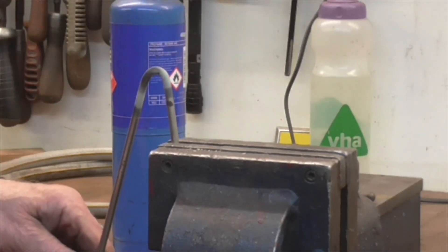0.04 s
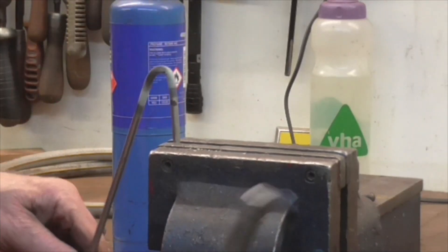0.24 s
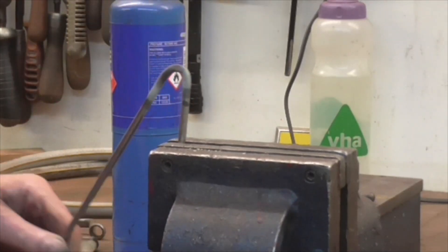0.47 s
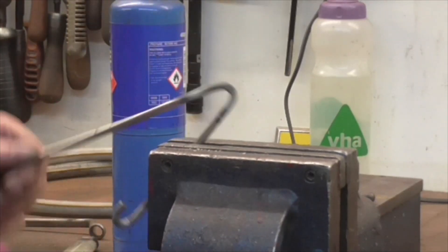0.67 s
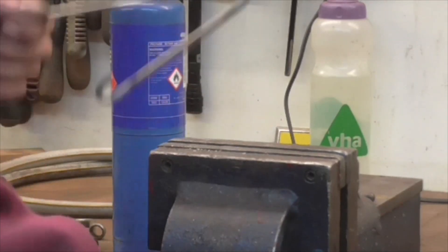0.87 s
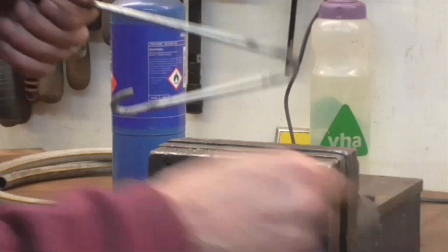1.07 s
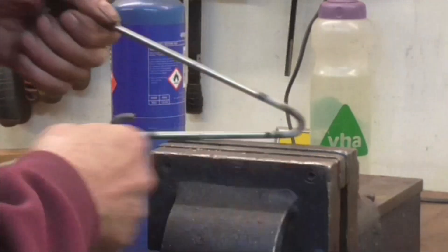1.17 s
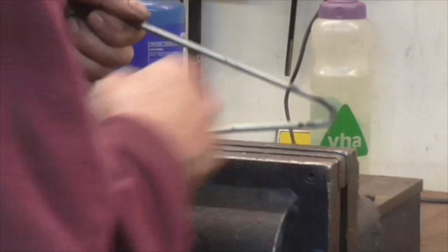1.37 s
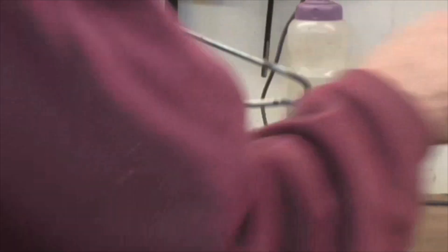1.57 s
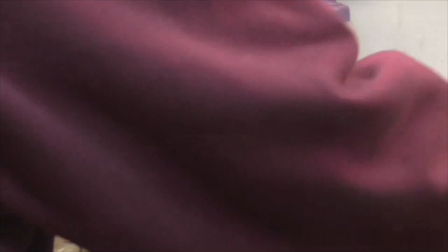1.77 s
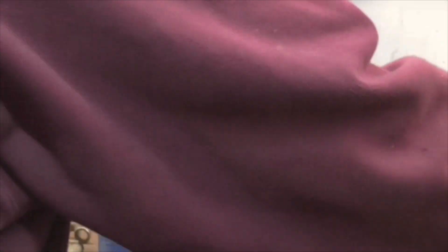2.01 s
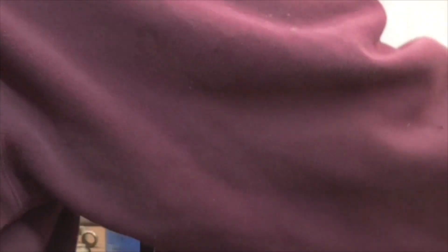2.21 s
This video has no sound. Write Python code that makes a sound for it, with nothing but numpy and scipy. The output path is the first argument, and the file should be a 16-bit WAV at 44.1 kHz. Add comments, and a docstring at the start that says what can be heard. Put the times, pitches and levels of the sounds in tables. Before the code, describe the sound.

A vise handle's metallic clank dominates: after faint hand brushing and small knocks from 0.2 seconds, it scrapes at 0.3 and lands sharply at 0.4, booming through the bench. Low grinding and weak knocks fade by 1.0. A steel rod clinks brightly at 1.25, a sleeve brushes near 1.6, and a tool clanks at 1.97, with tiny ticks at 2.1. Close, small workshop, faint low hum.

```python
"""A small workshop, where a bench vise is slackened: its handle scrapes, drops on its stop and shakes the bench.
The screw grinds, a bent steel rod is drawn from the jaws and clinks on the vise, a steel tool clanks on
the bench, a sleeve brushes past; a faint hum lies under it all.
Steel and bench ring as decaying modes, with noise cracks sounding beside them; scrapes, grinding and brushing
are trains of random slip clicks; the background is shaped noise and a sine."""
import sys
import numpy as np
from scipy import signal
from scipy.fft import rfft, irfft, next_fast_len
from scipy.io import wavfile

SR = 44100
rng = np.random.default_rng(int(sys.argv[2]) if len(sys.argv) > 2 else 0)


def transcribe(u):
    """Save the signal u as a 16-bit wav file named by the first command-line argument.

    u: samples, shape (n,) or (channels, n), limited to [-1, 1]; the rate is SR.
    q: integer samples, one column per channel.
    """
    v = np.clip(np.atleast_2d(u).T, -1, 1)
    q = np.round(v * 32767).astype(np.int16)
    wavfile.write(sys.argv[1], SR, q)


N = 99225
T = np.arange(int(0.7 * SR)) / SR  # time axis of one event, s
LEVEL_WINDOW_S = 0.01  # a blow's level is its energy averaged over this
EDGE_HZ = 16200  # upper band limit

# Modes of the handle. Each row: frequency in Hz, relative level in dB, t60 in s.
HANDLE_MODES = [(1650, -12, .1), (1935, -12, .1), (2540, -15, .05), (4750, -17, .14), (4880, -13, .07),
                (5040, -21, .2), (5445, -8, .05), (5545, 2, .055), (5562, -27, .35), (6480, -3, .03),
                (7560, -8, .05), (7665, -4, .05), (8010, -8, .04), (10840, -8, .05)]
# Colour of the handle's contact. Each row: frequency in Hz, relative density in dB.
HANDLE_CRACK = [(30, -31), (100, -3.5), (700, -4), (1900, -4), (3000, -3.5), (6300, 3), (9000, -11.5),
                (11000, -6.5), (16000, -23.5)]
# Handle on its stop. Each row: start in s, ring level in dB, contact level in dB, crack t60 in s.
HANDLE_HITS = [(0.4043, -18.5, -20, 0.036)]


def handle_drop():
    """The handle lands on its stop: steel modes and a short contact crack."""
    return clanks(HANDLE_HITS, HANDLE_MODES, HANDLE_CRACK, shimmer_db=-19, shimmer_t60=0.15)


# Colour of handle friction. Each row: frequency in Hz, relative level in dB.
SLIDE_COLOUR = [(30, -48), (200, -47), (1850, 11.5), (2300, 0.5), (3800, 3.5), (4800, 8), (5600, -2.5),
                (7700, 1.5), (9000, -20), (15000, -21)]
# Handle sliding through its hole. Each row: start in s, length in s, level in dB.
SLIDES = [(.2, 0.03, -71), (0.287, 0.036, -40.5), (0.32, .012, -34.5), (0.3286, .014, -24.5),
          (0.345, 0.069, -65)]
HAND_DAMPING = 0.444  # share of the ring time left while the handle is pushed along


def handle_slide():
    """Stick-slip clicks excite the handle's own modes, damped by the hand."""
    out = np.zeros(N)
    damped = [(hz, db, t60 * HAND_DAMPING) for hz, db, t60 in HANDLE_MODES]
    for start_s, length_s, db in SLIDES:
        drive = slips(length_s, per_s=5000, spread_db=-3, rise_s=0.002, fall_s=0.0019)
        scrape = colour(through(drive, damped, ring_db=0), SLIDE_COLOUR)
        add(out, start_s, sized(scrape, db, length_s))
    return out


# Colour of the wooden bench. Each row: frequency in Hz, relative density in dB.
WOOD_COLOUR = [(25, -23), (60, -5), (90, 8.5), (170, 2), (330, 6), (500, 0.5), (750, -0.5), (1950, -3.5),
               (2500, -17.5), (6000, -1), (15000, -39)]
# Modes of the vise on its bench, plus a low 172 Hz thump of hand or sleeve. Each row: frequency in Hz, relative
# level in dB, t60 in s.
BENCH_MODES = [(172, -6, .1), (341, -11, .2), (398, -6, .17), (565, -12, .2), (633, -8, .2), (699, 2, .15),
               (752, 0, .17), (824, -1, .19), (901, -4, .18), (995, -6, .22), (1225, -14, .12),
               (1429, -12, .14), (1658, -13, .12), (1915, -14, .1)]
# Knocks through the bench. Each row: start in s, level in dB, centre frequency in Hz.
KNOCKS = [(.194, -42, 1510), (.234, -38.5, 344), (.287, -31, 800), (.302, -32, 550), (.405, -32.5, 820),
          (.429, -26, 660), (0.4454, -27.5, 467), (0.451, -46.5, 83), (.635, -40.5, 700), (.756, -49, 480),
          (.903, -52, 1460), (0.936, -47.5, 390), (1.554, -49.5, 436), (1.564, -47.5, 1800),
          (1.607, -44, 200), (1.623, -44, 202), (1.638, -49, 231), (1.971, -36.5, 297), (1.981, -37, 287),
          (2.096, -41, 252), (2.157, -47, 298)]
BENCH_RING_DB = -14  # bench ringing relative to the thud, before colouring


def bench_knocks():
    """Dull knocks: a damped thud and bench modes, focused on one band."""
    out = np.zeros(N)
    for start_s, db, centre_hz in KNOCKS:
        blow = crack(t60=0.033) + amp(BENCH_RING_DB) * ring(BENCH_MODES)
        add(out, start_s, sized(colour(blow, WOOD_COLOUR, centre_hz, focus_db=16.5), db))
    return out


# Screw grinding, things pushed on the bench.
# Each row: start in s, length in s, level in dB, centre frequency in Hz.
GRINDS = [(0.204, .036, -33, 1170), (.24, 0.061, -39, 380), (.29, 0.098, -33.5, 700),
          (0.415, 0.0426, -31.5, 750), (0.507, 0.052, -48, 890), (0.584, 0.076, -53, 1826),
          (0.644, 0.056, -49, 440), (0.749, 0.118, -43, 540), (0.776, 0.04, -48, 1460),
          (0.869, 0.117, -51.5, 450), (0.908, 0.027, -58, 965), (1.603, .04, -45.5, 1360),
          (2.078, 0.026, -47.5, 820), (2.124, 0.073, -52.5, 290)]


def grinding():
    """Stick-slip clicks ring the vise and bench."""
    out = np.zeros(N)
    for start_s, length_s, db, centre_hz in GRINDS:
        drive = slips(length_s, per_s=1500, spread_db=1.5, rise_s=0.0056, fall_s=0.0086)
        carried = through(drive, BENCH_MODES, ring_db=-21)
        grind = colour(carried, WOOD_COLOUR, centre_hz, focus_db=10)
        add(out, start_s, sized(grind, db, length_s))
    return out


BOOM_DB, BOOM_RISE_S = -24, 0.027


def bench_boom():
    """After the handle lands, the vise swells into its own modes."""
    out = np.zeros(N)
    swell = ring(BENCH_MODES) * np.minimum(T / BOOM_RISE_S, 1)
    add(out, HANDLE_HITS[0][0], sized(swell, BOOM_DB))
    return out


# Modes of the rod. Each row: frequency in Hz, relative level in dB, t60 in s.
ROD_MODES = [(339, -12, .33), (1205, -5, .14), (1815, -8, .22), (3290, -10, .1), (4035, -10, .2),
             (5157, -8, .25), (6050, -5, .17), (6365, -4, .28), (7140, -9, .25), (7578, -4, .2),
             (7945, -6, .22), (8722, -4, .18), (10930, -10, .24), (13720, -1, .07)]
# Colour of the rod's contact. Each row: frequency in Hz, relative density in dB.
ROD_CRACK = [(100, -26), (330, 5.5), (1700, -1), (2800, -15), (3500, 0.5), (7500, -3), (10000, -9),
             (12600, -11.5), (13700, -4), (14400, -27), (16000, -28)]
# Rod striking steel. Each row: start in s, ring level in dB, contact level in dB, crack t60 in s.
ROD_HITS = [(.775, -77, -41, 0.054), (.802, -62, -45, 0.063), (1.2551, -34, -32, 0.078),
            (1.2595, -39.5, -32, 0.21)]


def rod_clinks():
    """The bent rod strikes steel: its modes and short contact cracks."""
    return clanks(ROD_HITS, ROD_MODES, ROD_CRACK, shimmer_db=-10.5, shimmer_t60=0.067)


# Modes of the tool. Each row: frequency in Hz, relative level in dB, t60 in s.
TOOL_MODES = [(335, 0, .16), (950, -3, .12), (1530, -3, .08), (2445, -9, .3), (3068, -6, .12),
              (4015, -5, .42), (5225, -10, .16), (5840, -6, .08), (6348, -2, .13), (8715, -8, .17),
              (9272, -8, .22), (10930, -12, .22), (11060, -15, .2), (12950, -19, .15)]
# Colour of the tool's contact. Each row: frequency in Hz, relative density in dB.
TOOL_CRACK = [(80, -17), (300, 13), (700, 5), (2300, 2), (2850, -14), (3500, -2.5), (6200, 2), (9000, -11),
              (15000, -21)]
# Tool blows. Each row: start in s, ring level in dB, contact level in dB, crack t60 in s.
TOOL_HITS = [(1.9655, -44.5, -35.5, 0.099), (1.969, -32.5, -33, 0.028), (2.082, -77, -47, 0.14)]


def tool_clanks():
    """The steel tool clanks on the bench: its modes and short contact cracks."""
    return clanks(TOOL_HITS, TOOL_MODES, TOOL_CRACK, shimmer_db=-9.5, shimmer_t60=0.18)


# Colour of skin and cloth. Each row: frequency in Hz, relative level in dB.
BRUSH_COLOUR = [(100, -8), (500, -2), (1700, 1.5), (2800, -6), (5500, 1.5), (8000, -5.5), (12000, -16),
                (16000, -22.5)]
# Hands and sleeve brushing. Each row: start in s, length in s, level in dB.
BRUSHES = [(0, 0.045, -64.5), (0.044, 0.17, -55.5), (0.195, 0.22, -51), (0.69, 0.035, -48),
           (0.771, 0.05, -56), (1.556, 0.078, -47.5), (1.937, 0.083, -52), (2.074, 0.0296, -50),
           (2.116, 0.026, -53)]


def brushes():
    """Fine friction of skin and cloth: dense small slips."""
    out = np.zeros(N)
    for start_s, length_s, db in BRUSHES:
        drive = slips(length_s, per_s=7700, spread_db=3, rise_s=0.011, fall_s=0.0067)
        add(out, start_s, sized(colour(drive, BRUSH_COLOUR), db, length_s))
    return out


# Colour of the ticks. Each row: frequency in Hz, relative level in dB.
TICK_COLOUR = [(200, -18), (2500, -24), (5500, 0.5), (8000, -14), (13500, -13), (16000, -17)]
# Small sharp ticks. Each row: start in s, level in dB, centre frequency in Hz.
TICKS = [(.0135, -79, 5500), (0.0172, -50, 5900), (0.272, -46.5, 14000), (0.279, -56, 11000),
         (0.769, -57, 13000), (2.084, -45, 8300), (2.091, -45.5, 8400)]


def ticks():
    """Tiny contacts of steel edges: very short cracks in one band."""
    out = np.zeros(N)
    for start_s, db, centre_hz in TICKS:
        tick = colour(crack(t60=0.011), TICK_COLOUR, centre_hz, focus_db=15.5)
        add(out, start_s, sized(tick, db))
    return out


# Colour of the room noise. Each row: frequency in Hz, relative density in dB.
FLOOR_COLOUR = [(20, -33), (50, -18), (78, -1.5), (100, 2.5), (200, -7), (500, -1), (1000, -10.5),
                (2200, -8), (3100, -16.5), (5000, -11), (9000, -18.5), (15000, -23), (16000, -50)]
FLOOR_DB, HUM_HZ, HUM_DB = -59, 118.4, -67


def background(side_db=-7):
    """Steady shaped noise, partly unlike left and right, and a low sine hum."""
    mid, side = (sized(colour(rng.standard_normal(N), FLOOR_COLOUR), FLOOR_DB, N / SR) for _ in range(2))
    hum = amp(HUM_DB) * np.sqrt(2) * np.sin(2 * np.pi * HUM_HZ * np.arange(N) / SR)
    return mid + hum + amp(side_db) * np.array([side, -side])


TWIN_SPLIT, TWIN_DB = 0.0075, 5  # largest detuning as a share of frequency; level relative to its mode


def clanks(hits, modes, spectrum, shimmer_db, shimmer_t60):
    """Each blow is a short crack, the steel's beating pairs of modes and a shimmer of weak partials."""
    out = np.zeros(N)
    twins = [(hz * (1 + TWIN_SPLIT * rng.uniform(-0.71, 1)), db + TWIN_DB, t60 / 2)
             for hz, db, t60 in modes]
    shimmer = overtones(shimmer_t60, low_hz=992.6, count=110)
    for start_s, ring_db, contact_db, crack_t60 in hits:
        contact = colour(crack(crack_t60) + amp(shimmer_db) * shimmer, spectrum)
        add(out, start_s, sized(ring(modes + twins), ring_db) + sized(contact, contact_db))
    return out


def overtones(mean_t60, low_hz, count):
    """The many partials of an irregular piece of steel, one at random in each equal band."""
    band_hz = (EDGE_HZ - low_hz) / count
    rows = rng.random((count, 2))
    return ring([(low_hz + band_hz * (k + place), 0, mean_t60 * (0.5 + life))
                 for k, (place, life) in enumerate(rows)])


def ring(modes):
    """An object's modes, struck once: decaying sines in random phase, energy 1."""
    return unit(sum(amp(db) * dying(t60) * np.sin(2 * np.pi * (hz * T + rng.random()))
                    for hz, db, t60 in modes))


def crack(t60):
    """Countless heavily damped modes, as decaying random-sign noise."""
    return unit(rng.choice([-1., 1.], len(T)) * dying(t60))


def dying(t60):
    """Exponential decay, 60 dB in t60 seconds."""
    return np.exp(-np.log(1000) * T / max(t60, 0.001))


def slips(length_s, per_s, spread_db, rise_s, fall_s):
    """Stick-slip clicks of uneven size at random times under one stroke."""
    stroke = np.clip(T / rise_s, 0, 1) * np.clip((length_s - T) / fall_s, 0, 1)
    size = amp(spread_db * np.minimum(rng.exponential(1, len(T)), 3))
    sign = rng.choice([-1., 1.], len(T))
    happens = rng.random(len(T)) < per_s / SR
    return unit(stroke * size * sign * happens)


def through(drive, modes, ring_db):
    """A drive plus the ringing it excites."""
    ringing = signal.fftconvolve(drive, ring(modes))[:len(T)]
    return drive + amp(ring_db) * unit(ringing)


def colour(x, points, centre_hz=1000, focus_db=0):
    """Minimum-phase filter: a spectrum, with a hump losing about focus_db per octave off its centre."""
    size = next_fast_len(2 * len(x), True) // 2 * 2
    hz = np.fft.rfftfreq(size, 1 / SR)
    octaves = np.log2((hz + 20) / centre_hz)
    db = read(points, hz) - focus_db * (np.hypot(1, 2 * octaves) - 1) / 2
    # folding the cepstrum makes the filter causal
    cepstrum = irfft(np.log(amp(np.maximum(db, -100))))
    cepstrum[1:size // 2] *= 2
    cepstrum[size // 2 + 1:] = 0
    return irfft(rfft(x, size) * np.exp(rfft(cepstrum)))[:len(x)]


def amp(db):
    """Decibels to gain."""
    return 10 ** (np.asarray(db) / 20)


def read(points, hz):
    """A table's value, interpolated on a log-frequency axis."""
    f, value = np.transpose(points)
    return np.interp(np.log(hz + 1), np.log(f + 1), value)


def unit(x):
    """Scales to energy 1."""
    return x / np.sqrt(np.sum(x ** 2) + 1e-20)


def sized(x, db, length_s=LEVEL_WINDOW_S):
    """Gives x the energy of a sound of RMS level db lasting length_s."""
    return unit(x) * amp(db) * np.sqrt(length_s * SR)


def add(mix, start_s, sound):
    """Mixes a sound in at its start time."""
    part = mix[max(round(start_s * SR), 0):][:len(sound)]
    part += sound[:len(part)]


# Reverberation of the workshop. Each row: frequency in Hz, t60 in s.
ROOM_T60 = [(100, 0.76), (400, 0.58), (1000, 0.56), (2800, 0.52), (7000, 0.39), (14000, .25)]
ROOM_GAP_S, ROOM_BUILD_S = 0.0013, 0.0049  # silence before the tail, then its rise


def room(x, wet_db, side_db, pan_db):
    """Direct sound and a short noise tail, partly unlike left and right."""
    hz, t, z = signal.stft(rng.standard_normal((2, len(T))), SR, nperseg=256)
    decay = np.exp(-np.log(1000) * t / read(ROOM_T60, hz)[:, None])
    tails = signal.istft(z * decay, SR, nperseg=256)[1][:, :len(T)]
    tails = tails * np.clip((T - ROOM_GAP_S) / ROOM_BUILD_S, 0, 1)
    mid, side = (amp(wet_db) * signal.fftconvolve(x, unit(tail))[:N] for tail in tails)
    side = side * amp(side_db)
    left = (x + mid + side) * amp(pan_db / 2)
    right = (x + mid - side) * amp(-pan_db / 2)
    return np.array([left, right])


def scene():
    """All sources in the workshop, each with its own share of room; positive pan is left."""
    return (room(handle_drop(), wet_db=-9.5, side_db=-5, pan_db=2)
            + room(rod_clinks(), wet_db=-4.5, side_db=-4.5, pan_db=1.0)
            + room(tool_clanks(), wet_db=-7.5, side_db=-4.5, pan_db=-1.4)
            + room(handle_slide(), wet_db=-5.5, side_db=-5.5, pan_db=0)
            + room(bench_knocks() + grinding() + bench_boom(), wet_db=-9.5, side_db=-6, pan_db=-0.5)
            + room(brushes(), wet_db=-2, side_db=-1.5, pan_db=1.2)
            + room(ticks(), wet_db=-7, side_db=-4.5, pan_db=0)
            + background())


# Balance of the microphones. Each row: frequency in Hz, left minus right in dB.
MIC_BALANCE = [(60, -14.5), (120, 2), (240, -1.5), (480, -0.5), (950, -1.0), (1890, -1), (3770, -1),
               (7520, -2), (15000, 1)]


def record(dry):
    """Two microphones of slightly unlike colour, then the band limit."""
    lean_db = read(MIC_BALANCE, np.fft.rfftfreq(2 * N, 1 / SR)) / 2
    pair = irfft(rfft(dry, 2 * N) * amp([lean_db, -lean_db]))[:, :N]
    lowpass = signal.firwin(401, EDGE_HZ, window=("kaiser", 9), fs=SR)
    return signal.oaconvolve(pair, lowpass[None], "same")


dry = scene()
out = record(dry)
transcribe(out)
```